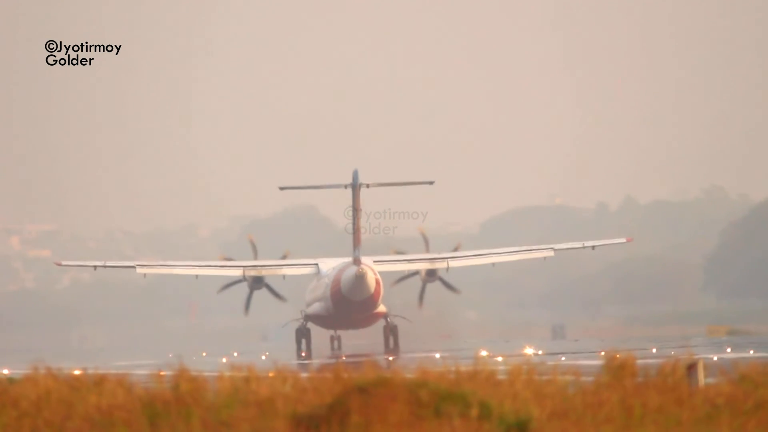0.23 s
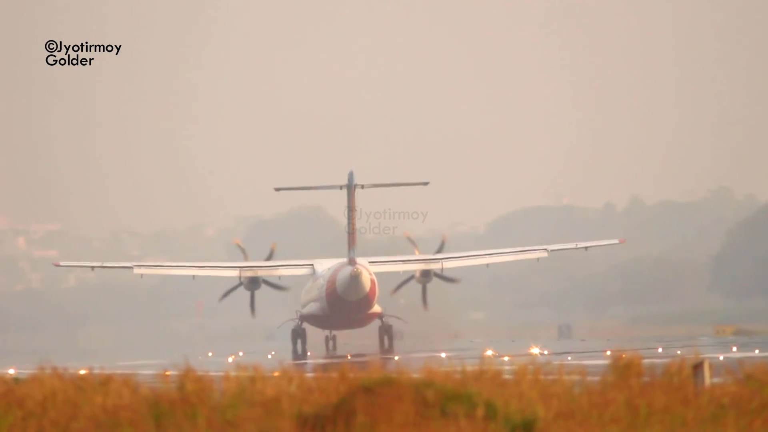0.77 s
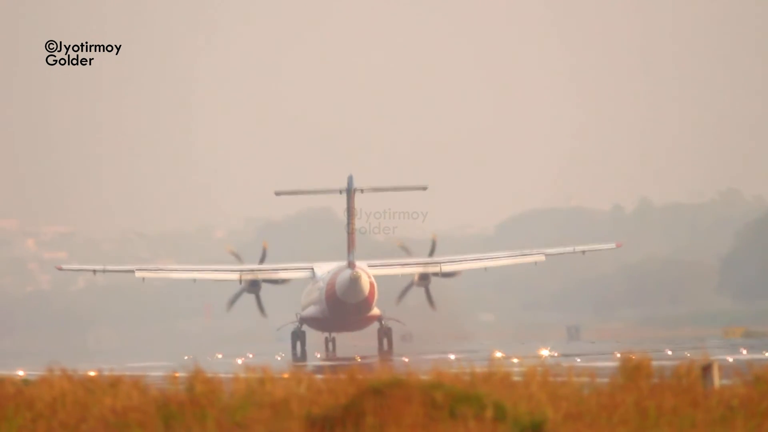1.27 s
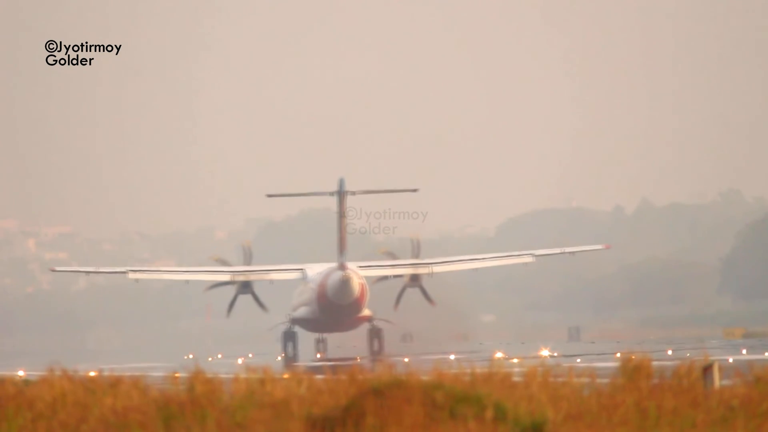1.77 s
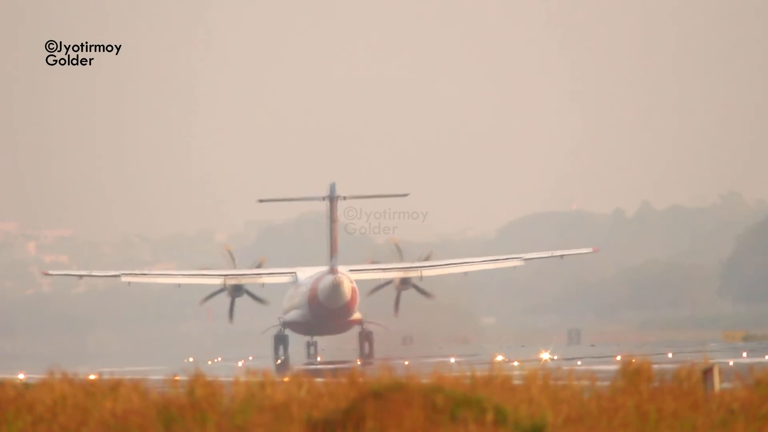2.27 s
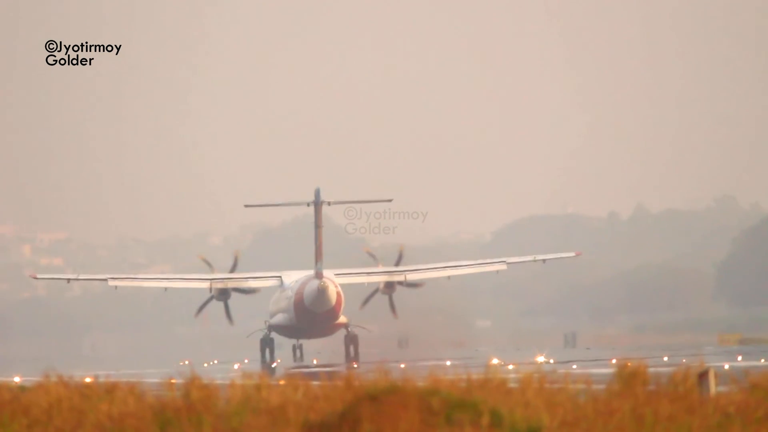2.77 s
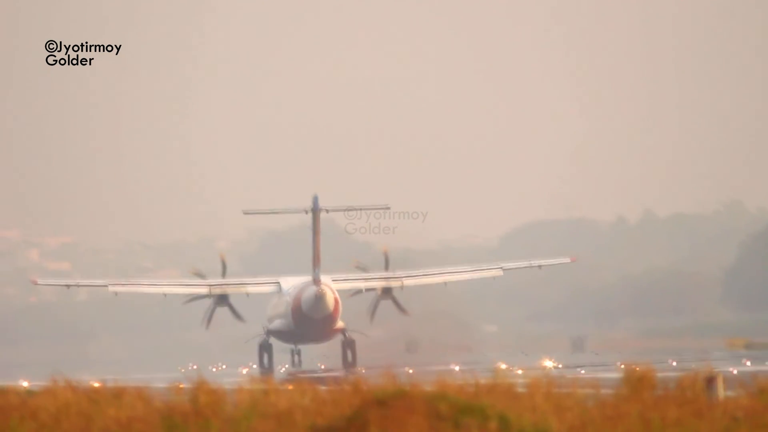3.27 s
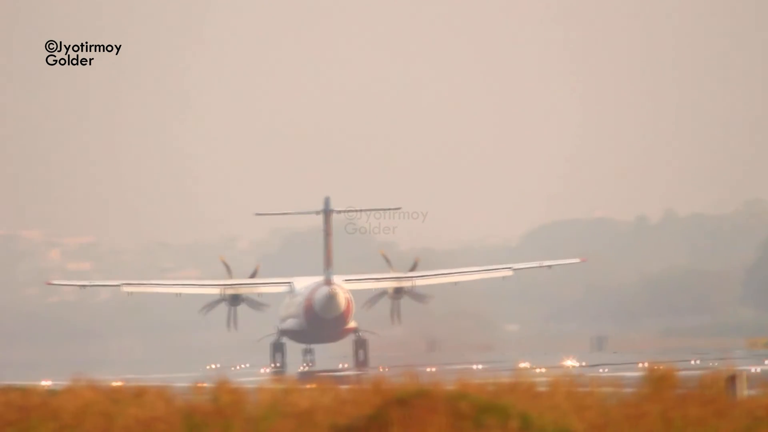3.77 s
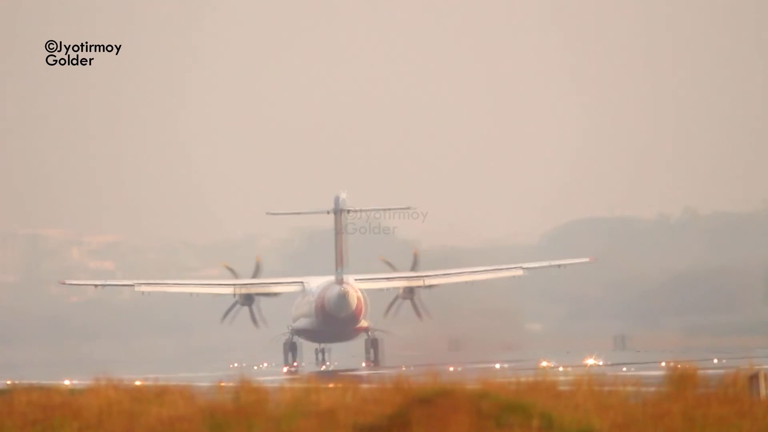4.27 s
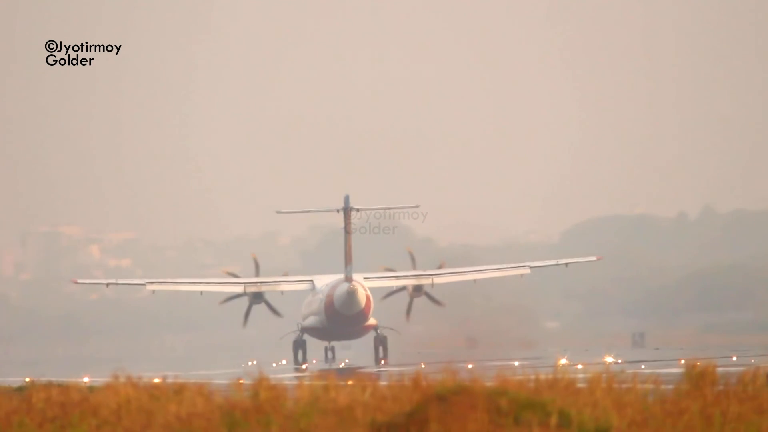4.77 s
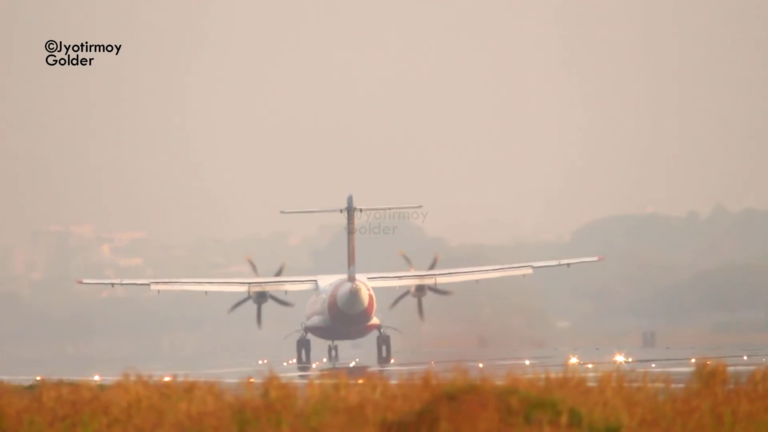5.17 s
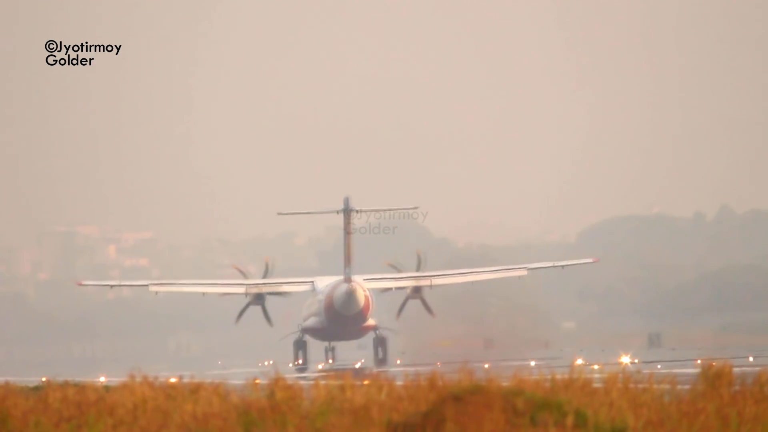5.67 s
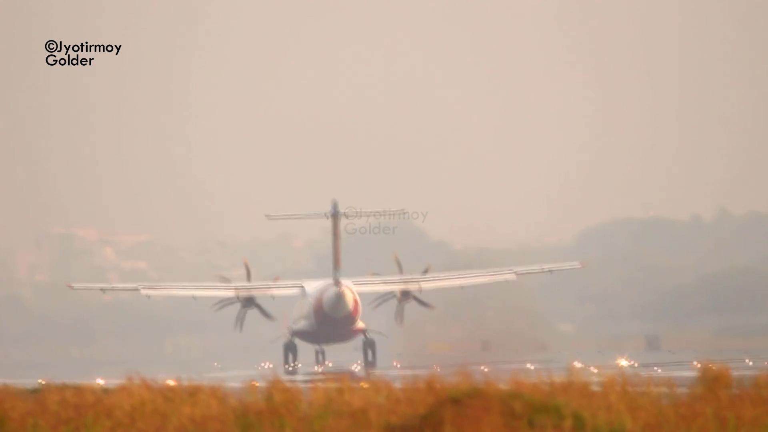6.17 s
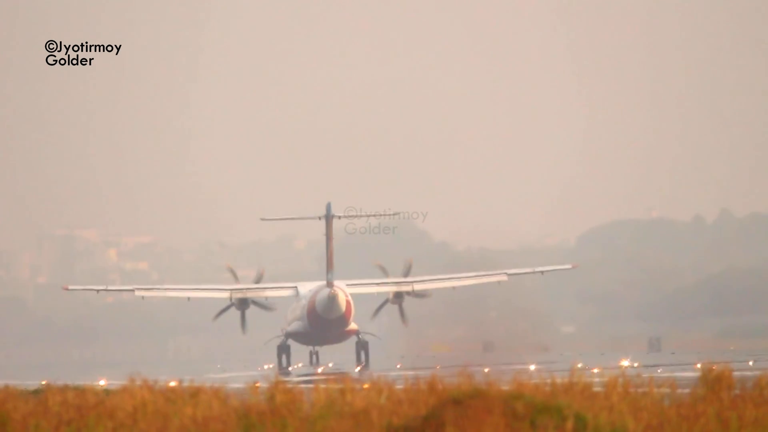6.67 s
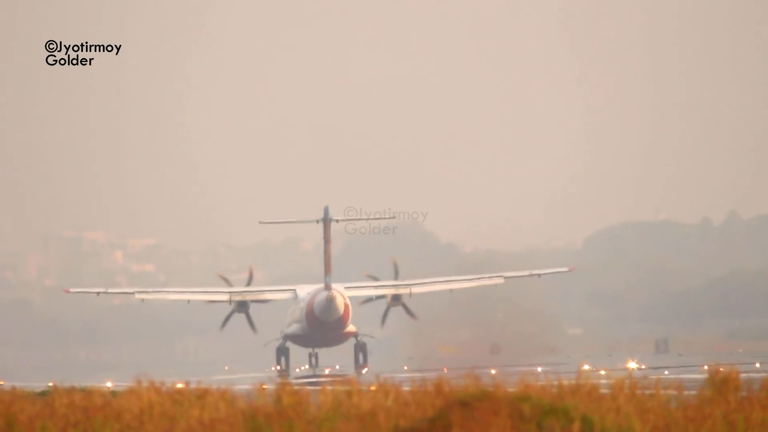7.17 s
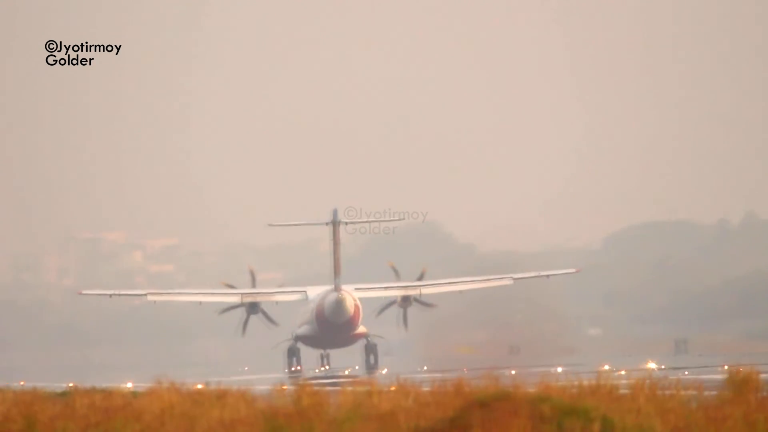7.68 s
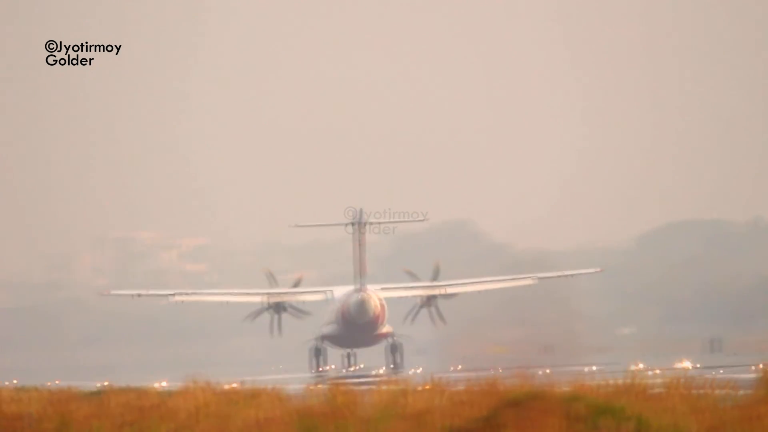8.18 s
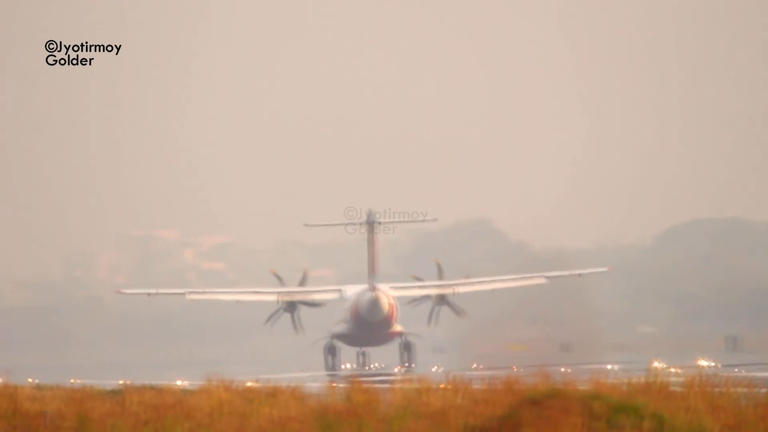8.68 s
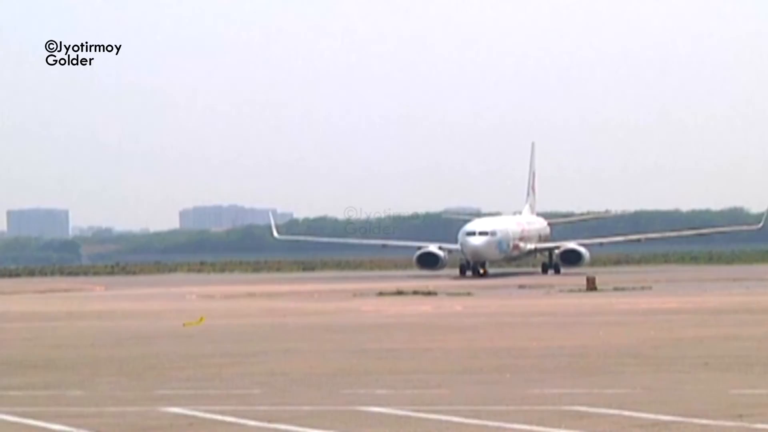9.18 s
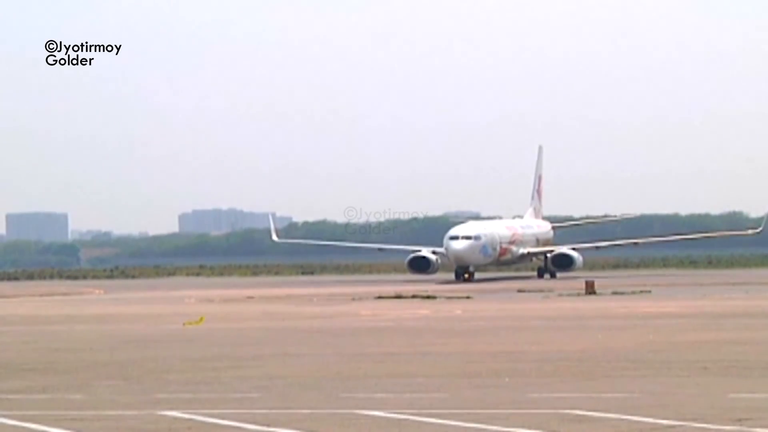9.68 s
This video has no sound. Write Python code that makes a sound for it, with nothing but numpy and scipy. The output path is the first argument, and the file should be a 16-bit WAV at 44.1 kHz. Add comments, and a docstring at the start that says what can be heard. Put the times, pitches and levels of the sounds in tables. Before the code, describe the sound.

Low, humming turboprop drone with a fluttering throb and faint buzzing hiss; the deepest tone sinks away near the end, leaving it thinner and uneven.

```python
"""Twin turboprop drone

A twin turboprop airliner drones as its propellers creep up in speed; sines at multiples of the blade rate
follow drawn levels as the two propellers drift in and out of step, and the deepest nearly cancels late on.
Weak lines between them make a throb every fourth blade pass; shaped noise makes the rush of air.
Hiss pulsing with the blades is a light buzz; wavering sines squeak once, and a noise burst ticks.
"""
import sys
import numpy as np
from scipy import signal
from scipy.fft import rfft, irfft
from scipy.io import wavfile
from scipy.ndimage import uniform_filter1d

SR = 44100
rng = np.random.default_rng(int(sys.argv[2]) if len(sys.argv) > 2 else 0)


def log_audio(samples):
    """Write samples as a 16-bit WAV file to the path given in sys.argv[1]."""
    # one column per channel
    frames = np.atleast_2d(samples).T
    # limit to full scale, then quantise
    limited = np.clip(frames, -1, 1)
    pcm = np.round(limited * 32767).astype(np.int16)
    wavfile.write(sys.argv[1], SR, pcm)


N = 437913
TIME = np.arange(N) / SR  # s


def gain_of(db):
    """Decibels to amplitude."""
    return 10 ** (np.asarray(db) / 20)


def evened(x):
    """Scales to rms 1."""
    return x / np.sqrt(np.mean(abs(x) ** 2) + 1e-20)


def curve(rows):
    """Second column of a (seconds, value) table, joined by straight lines at every sample."""
    seconds, values = np.transpose(rows)
    return np.interp(TIME, seconds, values)


def read_spectrum(points, hz):
    """Spectrum in dB, joined on a log-frequency axis."""
    point_hz, db = np.transpose(points)
    return np.interp(np.log(hz + 1), np.log(point_hz + 1), db)


def drift(rate_hz, size=4096):
    """Slow random signal of rms 1, with little faster than rate_hz."""
    hz = np.fft.rfftfreq(size, N / SR / size)
    lowpass = 1 / (1 + (hz / rate_hz) ** 2)
    slow = irfft(rfft(rng.standard_normal(size)) * lowpass)
    return evened(np.interp(TIME, np.linspace(0, N / SR, size), slow - slow.mean()))


def tone(turns, scatter, rate_hz):
    """Line of rms 1: a steady part plus a part scattered by turbulence."""
    angle = 2 * np.pi * (turns + rng.random())
    in_phase = (1 + scatter * drift(rate_hz)) * np.cos(angle)
    quadrature = scatter * drift(rate_hz) * np.sin(angle)
    return evened(in_phase + quadrature)


def noise(spectrum, ripple_db, ripple_bins):
    """Coloured noise of rms 1, rippled by many small resonances about ripple_bins wide."""
    hz = np.fft.rfftfreq(N, 1 / SR)
    ripple = rng.standard_normal(len(hz))
    for _ in range(2):
        ripple = uniform_filter1d(ripple, ripple_bins)
    colour_db = read_spectrum(spectrum, hz) + ripple_db * evened(ripple)
    return evened(irfft(rfft(rng.standard_normal(N)) * gain_of(colour_db), N))


def patchy(x, depth_db, frames=24, bins=14):
    """Turbulence lifts and lowers patches of time and frequency."""
    z = signal.stft(x, nperseg=1024, noverlap=768)[2]
    field = rng.standard_normal(z.shape)
    for _ in range(2):
        field = uniform_filter1d(field, bins, axis=0)
        field = uniform_filter1d(field, frames, axis=1)
    patched = z * gain_of(depth_db * evened(field))
    return signal.istft(patched, nperseg=1024, noverlap=768)[1][:N]


def filtered(x, order, edge_hz, kind="low"):
    """Zero-phase Butterworth filter, run forwards and backwards."""
    return signal.sosfiltfilt(signal.butter(order, edge_hz, kind, fs=SR, output="sos"), x)


# Blade tone, both propellers summed. Each row: time in seconds, rms level in dB.
DRONE_LEVEL = [(0.0, -34.5), (3.93, -35.1), (4.37, -37.5), (5.51, -34.6), (6.26, -35.7), (7.3, -35),
               (7.79, -38.0), (8.14, -42.5), (8.54, -59.5), (8.74, -47.5), (9.28, -41), (9.93, -49)]


def blade_tone(turns):
    """Deep, nearly pure tone of the blades passing."""
    return gain_of(curve(DRONE_LEVEL)) * np.sqrt(2) * np.cos(2 * np.pi * turns)


# Overtones that swell up or sink away, and return.
# Each row: middle in seconds, length in seconds, multiple of the blade rate, lift in dB.
SWELLS = [(.8, .5, 4, -7), (1.688, .6, 4, 5.5), (2.35, 1.3, 6, 5), (2.83, 0.18, 7, 14.5),
          (2.878, 0.38, 4, 11), (2.92, .65, 5, 9), (3.4, .3, 2, -6), (4.55, 1.6, 7, 3),
          (4.637, 0.53, 4, 11.5), (4.75, .8, 8, 8), (5.2, .4, 5, 6.5), (6.498, 1.14, 6, 8), (6.8, .4, 4, 4),
          (7.6, 1.6, 4, 6), (7.603, .6, 6, 7.5), (8.6, 0.55, 4, -6), (8.72, .4, 2, 6), (9.25, 0.76, 6, 5.5),
          (9.587, 0.45, 5, 8.5)]


def swell_db(multiple):
    """Smooth arches by which one overtone leaves its usual level."""
    return sum(lift_db * np.cos(np.pi * np.clip((TIME - middle_s) / length_s, -.5, .5))
               for middle_s, length_s, k, lift_db in SWELLS if k == multiple)


# Tone at twice the blade rate, before swells. Each row: time in seconds, rms level in dB.
SECOND_LEVEL = [(0.0, -54), (1.29, -60.5), (2.28, -55), (3.82, -64), (4.02, -57.5), (6.06, -52.3),
                (7.15, -53), (7.5, -61.5), (7.89, -51), (9.14, -65), (9.48, -53), (9.93, -71)]
# Tone at three times the blade rate, before swells. Each row: time in seconds, rms level in dB.
THIRD_LEVEL = [(0.0, -56.5), (0.4, -58.5), (1.04, -53), (3.77, -58.5), (3.97, -67.8), (4.17, -60.6),
               (4.67, -58), (4.92, -68.9), (5.46, -56), (7.4, -50.5), (8.49, -63), (9.93, -54)]
# Rasp above them. Each row: multiple of the blade rate, level in dB at the start before wander and swells.
RASP = [(4, -67.5), (5, -71), (6, -71)]
RASP_RISE_DB_PER_S, RASP_WANDER_DB, RASP_WANDER_HZ = 0.47, 0.46, 1.5
# Top of the stack. Each row: multiple of the blade rate, level in dB before swells and common gain.
UPPER = [(7, -71.5), (8, -76.5), (9, -76.5), (10, -78.5), (11, -78.5), (12, -79.5), (13, -85), (14, -87.5),
         (15, -92.5), (16, -88.5)]
UPPER_START_DB, UPPER_RISE_DB_PER_S = -1.0, 0.15  # common gain
SMEAR_PER_MULTIPLE, SMEAR_HZ = .055, 5.4  # scattered share and its rate, up to the rasp


def overtones(turns):
    """Multiples of the blade rate; the higher, the more turbulence smears them or the faster they waver."""
    levels_db = {2: curve(SECOND_LEVEL), 3: curve(THIRD_LEVEL)}
    for k, start_db in RASP:
        wander_db = RASP_WANDER_DB * drift(RASP_WANDER_HZ)
        levels_db[k] = start_db + RASP_RISE_DB_PER_S * TIME + wander_db
    low = sum(gain_of(db + swell_db(k)) * tone(k * turns, SMEAR_PER_MULTIPLE * k, SMEAR_HZ)
              for k, db in levels_db.items())
    high = sum(gain_of(db + swell_db(k)) * tone(k * turns, 1.02, 0.28 * k) for k, db in UPPER)
    return low + high * gain_of(UPPER_START_DB + UPPER_RISE_DB_PER_S * TIME)


# Strength of the throb's lines. Each row: frequency in Hz, level in dB per line before the low lines' fade.
THROB_LINES = [(20, -86), (41, -67), (62, -76.5), (103, -55.5), (123, -64.5), (150, -87.5), (287, -75),
               (350, -82), (470, -79.5), (590, -78.5), (760, -81.5), (830, -91), (1100, -91), (1600, -100)]
LOW_THROB_START_DB, LOW_THROB_FALL_DB_PER_S = 1, 1  # lines below twice the blade rate


def throb(turns, count=78, order=4):
    """A cycle of four unequal blade passes puts weak lines between the blade tones: the drone flutters."""
    cycle_hz = turns[-1] / TIME[-1] / order
    low_gain = gain_of(LOW_THROB_START_DB - LOW_THROB_FALL_DB_PER_S * TIME)
    total = np.zeros(N)
    for k in range(1, count):
        if k % order == 0:
            continue  # coincides with a blade tone
        line = gain_of(read_spectrum(THROB_LINES, k * cycle_hz)) * tone(k * turns / order, .4, 1.8)
        total += line * (low_gain if k < 2 * order else 1)
    return total


# Colour of air and exhaust. Each row: frequency in Hz, relative density in dB per Hz.
ROAR_COLOUR = [(8, -15.5), (30, -2), (100, -0.5), (150, -6.5), (240, -8.5), (275, -12), (340, -8.5),
               (440, -14), (745, -19), (870, -23.5), (1300, -29), (2400, -33), (4600, -42.5), (9000, -60.5)]
# Mid rush. Each row: time in seconds, band gain in dB.
MID_RUSH_GAIN = [(0, -50), (1.1, -54.5), (2.2, -51), (4.7, -50.5), (7, -51), (9.93, -50.5)]
RUMBLE_START_DB, RUMBLE_FALL_DB_PER_S = -50.5, 0.27
UPPER_RUSH_DB, UPPER_RUSH_PULSE_DB = -51.0, 0.7


def roar(turns):
    """Turbulent air: a rumble that slowly eases, a mid rush that swells, an upper rush pulsed by the blades."""
    air = patchy(noise(ROAR_COLOUR, ripple_db=1.14, ripple_bins=200), depth_db=0.64)
    low = filtered(air, 2, 430)
    body = filtered(air, 2, 1400)
    rumble_db = RUMBLE_START_DB - RUMBLE_FALL_DB_PER_S * TIME
    upper_db = UPPER_RUSH_DB + UPPER_RUSH_PULSE_DB * np.cos(2 * np.pi * turns + 1.7)
    mid = (body - low) * gain_of(curve(MID_RUSH_GAIN))
    return low * gain_of(rumble_db) + mid + (air - body) * gain_of(upper_db)


# Colour of the fine hiss. Each row: frequency in Hz, relative density in dB per Hz.
HISS_COLOUR = [(1000, -16), (1900, 4), (3000, 0), (3400, 6.5), (4600, -0.5), (5200, 2.5), (6800, 2.4),
               (7400, 1.5), (8500, 1.5), (9200, 0), (10800, 0.3), (12300, -4), (13500, -9), (15600, -14.5)]
# Fine hiss. Each row: time in seconds, level in dB.
HISS_LEVEL = [(0, -75), (1, -76), (4.5, -75), (7.5, -74.5), (9, -75.5), (9.93, -75.5)]


def buzz(turns):
    """Hiss and squeak pulsing with the blades: most in the top treble, and while the drone shakes hardest."""
    drone_db = curve(DRONE_LEVEL)
    shake = gain_of(.5 * (drone_db - drone_db.max()))
    angle = 2 * np.pi * turns + 1.9
    pulse_db = shake * (1.7 * np.cos(angle) + .5 * np.sin(2 * angle) + 0.6 * drift(40))
    hiss = patchy(noise(HISS_COLOUR, ripple_db=0.25, ripple_bins=1500), depth_db=0.9)
    top = filtered(hiss, 3, 7500, "high")
    top_db = 1.2 * pulse_db + 0.82 * (shake - shake.mean())
    pulsed = (hiss - top) * gain_of(0.77 * pulse_db) + top * gain_of(top_db)
    return gain_of(curve(HISS_LEVEL)) * evened(pulsed) + squeak() * gain_of(pulse_db)


# Squeak modes. Each row: frequency in Hz at the peak before jitter, relative level in dB.
SQUEAK_MODES = [(3370, 0), (4680, -8), (5390, -1.5), (6710, -2.5)]
SQUEAK_START_S, SQUEAK_RISE_S, SQUEAK_DECAY_S = 6.97, .12, .19
SQUEAK_GAIN_DB, SQUEAK_SAG_PER_S, SQUEAK_JITTER_HZ = -80.7, .05, 14  # sag: fraction of pitch


def squeak():
    """Thin, unsteady tones that rise, then die away while their pitch sags a little."""
    past_peak_s = TIME - SQUEAK_START_S - SQUEAK_RISE_S
    rise = np.clip(1 + past_peak_s / SQUEAK_RISE_S, 0, 1)
    decay = np.exp(-np.maximum(past_peak_s, 0) / SQUEAK_DECAY_S)
    pitch = 1 - SQUEAK_SAG_PER_S * past_peak_s
    modes = 0
    for hz, db in SQUEAK_MODES:
        mode_hz = hz * pitch + SQUEAK_JITTER_HZ * drift(60)
        modes = modes + gain_of(db) * tone(np.cumsum(mode_hz) / SR, .6, 70)
    return gain_of(SQUEAK_GAIN_DB) * rise * decay * modes


# Faint tick. The single row: start in seconds, level in dB at the start, decay in seconds.
TICK = (6.845, -70, .016)
# Colour of the tick. Each row: frequency in Hz, relative density in dB per Hz.
TICK_COLOUR = [(3000, -28), (7500, -12), (8500, 2), (9300, -7), (12700, -10), (15000, -18)]


def tick():
    """One tiny, bright click: a noise burst with a sudden start and exponential decay."""
    start_s, db, decay_s = TICK
    envelope = (TIME > start_s) * np.exp(-abs(TIME - start_s) / decay_s)
    return gain_of(db) * noise(TICK_COLOUR, ripple_db=1, ripple_bins=1500) * envelope


BLADE_START_HZ, SPEED_UP_HZ_PER_S = 81.53, .1  # blade passes per second, and their rise


def scene():
    """All blade-driven sources follow one propeller speed."""
    turns = np.cumsum(BLADE_START_HZ + SPEED_UP_HZ_PER_S * TIME) / SR  # blade passes so far
    mix = blade_tone(turns) + overtones(turns) + throb(turns) + roar(turns) + buzz(turns) + tick()
    return mix[None]


EDGE_HZ = 15700


def record(dry):
    """The recorder's band limit: a linear-phase low-pass."""
    lowpass = signal.firwin(511, EDGE_HZ, window=("kaiser", 9), fs=SR)
    return signal.oaconvolve(dry, lowpass[None], "same")


dry = scene()
out = record(dry)
log_audio(out)
```